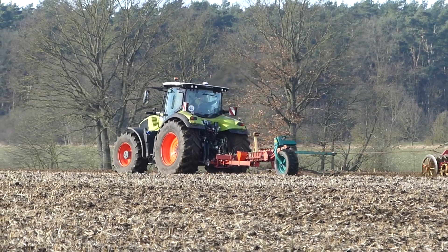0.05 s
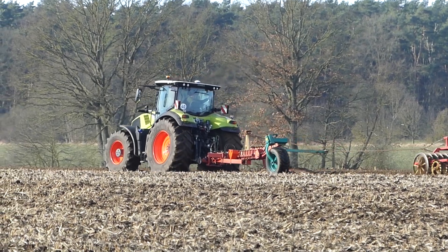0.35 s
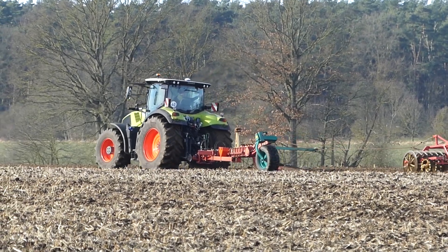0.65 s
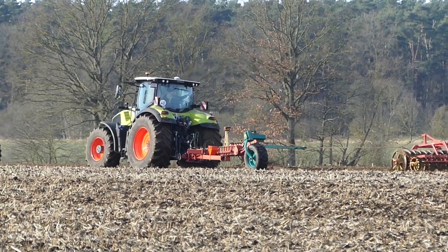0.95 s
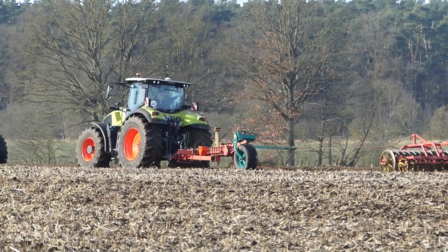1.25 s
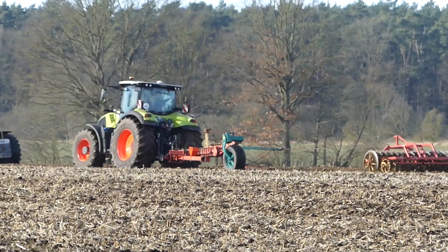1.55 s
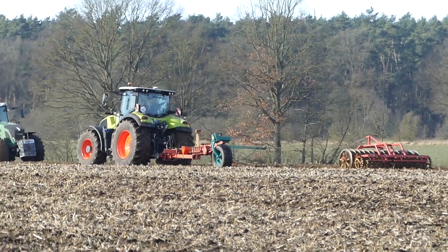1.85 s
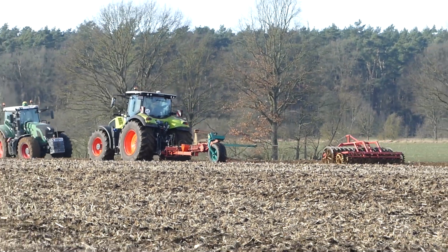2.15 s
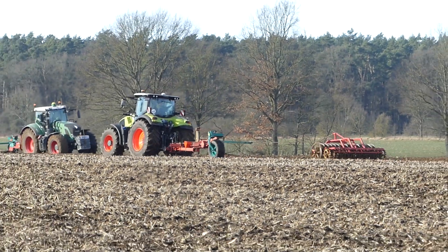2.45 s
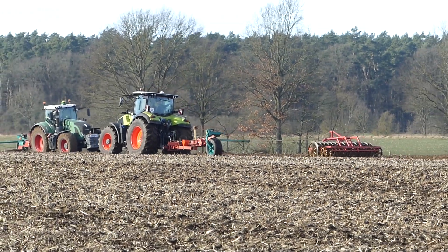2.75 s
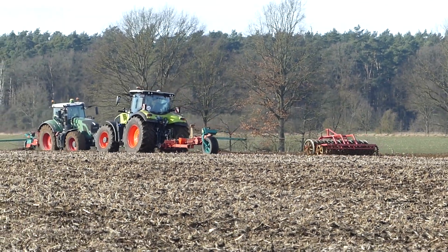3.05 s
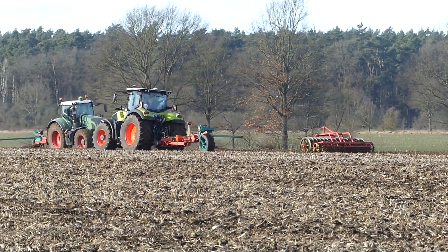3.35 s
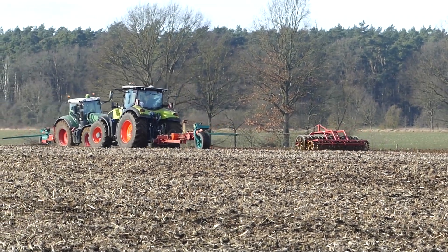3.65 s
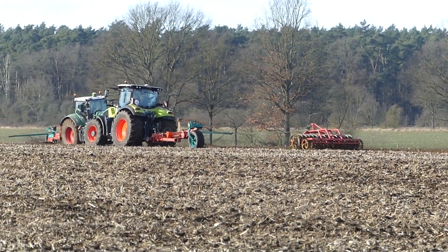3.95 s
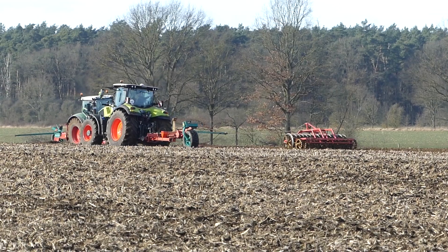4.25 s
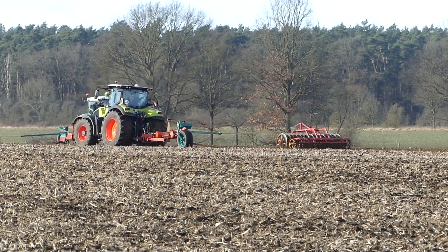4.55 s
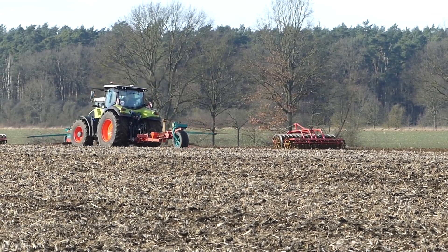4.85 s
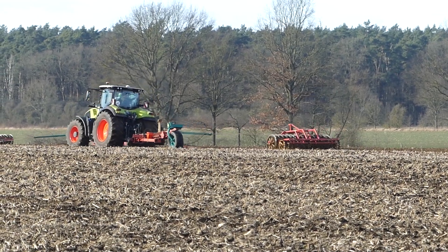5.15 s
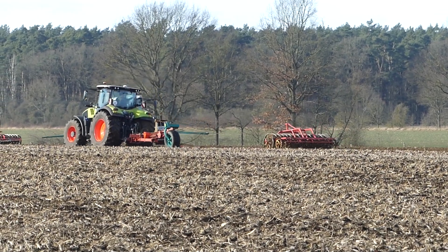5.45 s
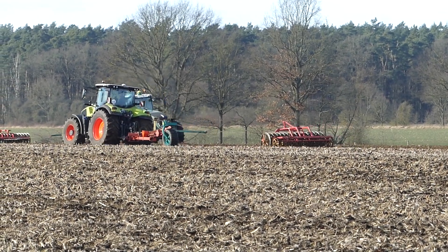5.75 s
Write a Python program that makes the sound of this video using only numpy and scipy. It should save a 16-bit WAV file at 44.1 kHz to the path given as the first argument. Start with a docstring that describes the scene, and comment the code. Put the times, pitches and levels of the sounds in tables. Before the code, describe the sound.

Far-off tractors work an open field, their low engine drones beating together over a soft wash of machinery. Gusts buffet the microphone close up, making it crackle, and a plastic lever ticks once. A faint gliding bird whistle comes about halfway through, then a run of dull, distant metal clunks. The wind eases briefly as the tractors grow louder, then returns with a second, wavering bird call.

```python
"""Dry stubble field. Far-off diesel tractors work it: beating exhaust drones, a wash of machinery,
an implement's steel frame clunking. Wind buffets the camcorder's microphone, which crackles now and then;
the zoom lever ticks and its motor whirs for a second. A bird of prey mews twice overhead,
a gliding whistle shaped by its throat. Faint hiss underneath."""
import sys
import numpy as np
from scipy import signal
from scipy.fft import rfft, irfft, next_fast_len
from scipy.io import wavfile
from scipy.ndimage import uniform_filter1d

SR = 44100
rng = np.random.default_rng(int(sys.argv[2]) if len(sys.argv) > 2 else 0)


def dump_mix(stems):
    """Bounce the given channels to the path in sys.argv[1] as a 16-bit WAV at rate SR."""
    frames = np.atleast_2d(stems).T  # one column per channel
    limited = np.clip(frames, -1, 1)  # hard clip at full scale
    pcm = np.round(limited * 32767).astype(np.int16)
    wavfile.write(sys.argv[1], SR, pcm)


N = 260190
TIME = np.arange(N) / SR

# gears, fans and tines in the soil: t/s, level/dB
MACHINERY_LEVEL = [(0.0, -71), (0.25, -75.5), (0.71, -76), (0.85, -74), (1.35, -74.5), (1.64, -71.5),
                   (2.02, -75), (2.46, -72), (3.86, -71), (4.67, -68.5), (5.01, -67.5), (5.36, -63.5),
                   (5.65, -69), (5.9, -71)]
# breeze at the microphone, two lulls: t/s, level/dB
BREEZE_LEVEL = [(0, -32.5), (1.1, -36.5), (3.8, -36), (3.97, -45.5), (4.45, -41), (4.95, -47),
                (5.35, -32.5), (5.9, -33)]


def undb(db):
    """Decibels to gain."""
    return 10 ** (np.asarray(db) / 20)


def unit(x):
    """Scale to rms 1."""
    return x / np.sqrt(np.mean(x ** 2))


def curve(rows):
    """Straight lines through (t/s, value) rows."""
    return np.interp(TIME, *np.transpose(rows))


def walk(rate_hz):
    """Smooth random wander, spread near 1."""
    hold = max(int(SR / rate_hz), 2)
    steps = np.repeat(rng.standard_normal(N // hold + 2), hold)
    return 1.287 * uniform_filter1d(uniform_filter1d(steps, hold), hold)[:N]


def resonance(hz, centre_hz, width_hz):
    """Complex gain of a resonance, 1 at its centre."""
    return 1j * hz * width_hz / (centre_hz ** 2 - hz ** 2 + 1j * hz * width_hz)


def colour(spectrum):
    """Gain over frequency through (f/Hz, level/dB) rows."""
    knots_hz, db = np.transpose(spectrum)
    return lambda hz: undb(np.interp(np.log(hz), np.log(knots_hz), db))


def noise(gain_at, band_hz=(0, SR)):
    """Noise shaped by gain_at(hz), rms 1 within the band."""
    size = next_fast_len(N)
    hz = np.arange(size // 2 + 1) * SR / size
    gain = gain_at(hz + 1e-6)
    in_band = (hz >= band_hz[0]) & (hz <= band_hz[1])
    power = np.sum(np.abs(gain[in_band]) ** 2) / len(hz)
    return irfft(rfft(rng.standard_normal(size)) * gain, size)[:N] / np.sqrt(power)


def even_noise(spectrum, window_s):
    """Coloured noise with its envelope evened out, rms 1."""
    raw = noise(colour(spectrum))
    envelope = np.abs(signal.hilbert(raw, next_fast_len(N))[:N])
    power = uniform_filter1d(envelope ** 2, int(window_s * SR))
    return unit(raw / np.sqrt(power + .1))


def hiss(treble_db=-82, follow_db_per_db=0.46):
    """Smooth treble hiss that swells a little with the machinery."""
    # hiss spectrum: f/Hz, level/dB
    spectrum = [(500, -1.5), (3000, 2.8), (6000, 1.2), (10000, 2.4), (15000, 2.5)]
    bed = noise(colour(spectrum), band_hz=(7000, 15000))
    work_db = curve(MACHINERY_LEVEL)
    return bed * undb(treble_db + follow_db_per_db * (work_db - work_db.mean()))


def gusts(lead_s=0):
    """Gust pressure envelope: bell-shaped surges that add in power."""
    # gusts at the microphone: t/s, level/dB, half width/s
    surges = [(0.068, -20, .045), (.28, -26, .04), (.385, -22, .045), (.455, -20.5, .04), (.53, -27, .04),
              (0.701, -28, .035), (0.918, -23.5, .045), (1.142, -30, .04), (1.656, -22, .065),
              (1.791, -20, .045), (2.021, -27.5, .035), (2.227, -29.5, .04), (2.494, -21.5, .05),
              (2.699, -29.5, .04), (2.917, -28, .04), (3.1, -28.5, .06), (3.264, -28, .04),
              (3.613, -26, .055), (3.761, -27.5, .07), (4.187, -26.5, .05), (4.461, -31, .045),
              (4.655, -28.5, .05), (5.47, -25, .09)]
    bells = [undb(db) * np.exp(-((TIME + lead_s - s) / width_s) ** 2) for s, db, width_s in surges]
    return np.sqrt(sum(bell ** 2 for bell in bells))


def wind(unrest_db=3, strong_gust_db=-22, thump_db=-32, thump_db_per_db=2.07, eddy_share_db=-21):
    """Slow pressure swings on the microphone; quicker eddies thump just ahead of strong gusts."""
    # slow swings: f/Hz, level/dB
    buffet_spectrum = [(1, -52), (5, -10), (11, 5.5), (21, 4), (32, -9.5), (55, -36), (90, -35), (160, -48),
                       (400, -68.5), (2000, -130)]
    # small eddies: f/Hz, level/dB
    eddy_spectrum = [(15, -8.5), (35, 10.5), (58, 2.5), (100, -14), (160, -25.5), (300, -32.5),
                     (700, -46.5), (2000, -78), (6000, -130)]
    breeze = undb(curve(BREEZE_LEVEL) + unrest_db * walk(14))
    thumps = undb(thump_db) * (gusts(lead_s=0.017) / undb(strong_gust_db)) ** thump_db_per_db
    buffet = even_noise(buffet_spectrum, window_s=0.05) * np.hypot(breeze, gusts())
    eddies = even_noise(eddy_spectrum, window_s=0.066) * (thumps + undb(eddy_share_db) * breeze)
    return buffet + eddies


def crackle(corner_hz=45, first_share=0.51, small_per_s=8, small_db=-51.5, small_spread_db=5,
            fizz_db=-41, fizz_s=0.024):
    """Microphone crackles: sharp two-stage clicks; small ones crowd in strong wind."""
    # sharp crackles: t/s, jump height/dB, second-stage lag/ms
    sharp = [(.0641, -29, .07), (.0659, -29, .12), (.084, -29, 0.11), (.122, -44.5, .05),
             (.1795, -41.5, 0.018), (.387, -35, .02), (.426, -40, 0.012), (.454, -46, .05),
             (.503, -42.5, 0.12), (.612, -40.5, 0.0041), (.677, -46.5, .3), (.754, -43.5, 0),
             (.913, -29.5, 0), (.946, -31, 0.076), (1.027, -36, .3), (1.159, -34, 0.087),
             (1.8, -35.5, 0.094), (1.835, -35.5, 0.17), (1.913, -42, 0.022), (2.051, -36, 0.31),
             (2.168, -45, 0.0051), (2.5465, -32, 0.033), (2.684, -45.5, .18), (2.745, -41, 0.0089),
             (2.9245, -36, .12), (3.036, -44, 0.021), (3.913, -41.5, 0.069), (4.096, -44.5, .07),
             (5.436, -32.5, .24), (5.489, -36, 0.22), (5.516, -38, 0.0098), (5.631, -42.5, 0.0093),
             (5.775, -39.5, 0), (5.844, -40, .03)]
    when, size, lag = rng.random((int(small_per_s * N / SR), 3)).T
    exposure = np.cumsum(undb(curve(BREEZE_LEVEL)) + gusts())
    times_s = np.minimum(np.interp(when, exposure / exposure[-1], TIME), TIME[-1] - .01)
    small = zip(times_s, small_db + small_spread_db * (2 * size - 1), .2 * lag)
    jumps = np.zeros(N)
    for s, db, lag_ms in [*sharp, *small]:
        height, start = undb(db), int(s * SR)
        jumps[start] += first_share * height
        jumps[start + int(round(lag_ms * SR / 1000))] += (1 - first_share) * height
    clicks = signal.lfilter([1], [1, -np.exp(-2 * np.pi * corner_hz / SR)], jumps + 1e-18)
    # a brief, faint treble fizz is added after each click
    tails = signal.lfilter([1], [1, -np.exp(-1 / (fizz_s * SR))], np.abs(jumps) + 1e-18)
    fizz = noise(lambda hz: resonance(hz, centre_hz=4300, width_hz=5100))
    return clicks + undb(fizz_db) * tails * fizz


def zoom():
    """The plastic lever ticks and the lens motor whirs."""
    # motor whir: t/s, level/dB
    motor_level = [(1.35, -110), (1.5, -89), (1.9, -89), (2.45, -83.5), (2.62, -110)]
    # lever ticks: t/s, level/dB
    ticks = [(1.4398, -61), (1.444, -61), (1.4514, -54.5), (1.455, -53)]
    # lever modes: f/Hz, level/dB, t60/s
    modes = [(1370, 0, 0.0046), (2780, 2, 0.0021), (3640, 0, 0.0052), (6430, -10, 0.0073)]
    whir = noise(lambda hz: resonance(hz, centre_hz=4100, width_hz=2200) ** 2)
    sound = undb(curve(motor_level)) * whir
    t = TIME[:SR // 20]
    ring = sum(undb(db - 60 * t / t60_s) * np.sin(2 * np.pi * hz * t) for hz, db, t60_s in modes)
    for s, db in ticks:
        sound[int(s * SR):][:len(t)] += undb(db) * ring
    return sound


def mew(glide, opening_db, tail_db, release_s, third_db,
        attack_s=0.046, hold_s=0.045, sink_s=0.015, catch_s=0.0083, jitter=0.0059, flutter_db=2.4):
    """Gliding whistle, loud then softer; harmonics 2 and 3 take turns in the throat's resonance."""
    # throat response: f/Hz, level/dB
    throat = [(700, -35), (1300, -30), (1520, -4), (1800, 1), (2100, 0), (2400, 3), (2650, -1), (3050, -3),
              (3700, -19), (5000, -45)]
    # voice catches at pitch drops: t/s
    catches = [5.297, 5.548]
    age_s, left_s = TIME - glide[0][0], glide[-1][0] - TIME
    gate = np.clip(age_s / attack_s, 0, 1) * np.sqrt(np.clip(left_s / release_s, 0, 1))
    gate *= np.prod([1 - np.exp(-((TIME - s) / catch_s) ** 2) for s in catches], axis=0)
    effort = np.exp(-np.maximum(age_s - attack_s - hold_s, 0) / sink_s)
    pitch_hz = curve(glide) * (1 + jitter * walk(250))
    phase = 2 * np.pi * np.cumsum(pitch_hz) / SR
    orders = np.arange(1, 4)[:, None]
    weights = colour(throat)(orders * pitch_hz) / orders ** 2 * undb((orders == 3) * third_db)
    weights *= np.sqrt(2 / np.sum(weights ** 2, axis=0))
    flutter = undb(flutter_db * np.array([walk(50) for _ in orders]))
    voice = np.sum(flutter * weights * np.sin(orders * phase), axis=0)
    return voice * gate * (effort * undb(opening_db) + (1 - effort) * undb(tail_db))


def bird(echo_db=-17, echo_t60_s=0.17, echo_delay_s=0.03):
    """Two mews and their faint scatter from the edge of the wood."""
    # pitch per mew, a long fall, then a wavering one: t/s, f/Hz
    glides = [
        [(2.865, 920), (2.897, 1245), (2.922, 1285), (2.931, 1425), (2.939, 1275), (2.98, 1165), (3.15, 895),
         (3.29, 795), (3.41, 730), (3.47, 650)],
        [(5.175, 985), (5.2, 1180), (5.235, 1240), (5.288, 1155), (5.3, 950), (5.33, 890), (5.425, 1035),
         (5.465, 865), (5.52, 885), (5.56, 700), (5.61, 855), (5.66, 880), (5.73, 710)],
    ]
    # shape per mew: opening/dB, tail/dB, release/s, third-harmonic trim/dB
    shapes = [(-61, -76, 0.058, -0.5), (-64.5, -68, 0.2, -3)]
    calls = sum(mew(glide, *shape) for glide, shape in zip(glides, shapes))
    t = TIME[:SR]
    trees = rng.standard_normal(SR) * undb(-60 * t / echo_t60_s) * (t > echo_delay_s)
    return calls + undb(echo_db) * signal.fftconvolve(calls, trees / np.linalg.norm(trees))[:N]


def implement(rattle_db=-75.5, rattle_spread_db=3, rise_s=0.0042):
    """Loose steel rattles and clunks through the frame's resonance, blurred by distance."""
    # hollow frame clunks: t/s, level/dB, decay/s
    clunks = [(0.322, -64.5, 0.03), (1.51, -63, 0.011), (3.236, -53.5, 0.0084), (3.299, -61.5, .035),
              (3.614, -57, 0.037), (3.7, -61, 0.026), (3.74, -51.5, 0.011), (3.815, -62.5, .03),
              (3.929, -62, 0.038), (4.021, -57, 0.019), (4.195, -60.5, 0.023), (4.57, -61, 0.026),
              (4.925, -64, 0.12)]
    shake = undb(rattle_db + rattle_spread_db * walk(16))
    for s, db, decay_s in clunks:
        shake += undb(db) * np.exp(-np.maximum((s - TIME) / rise_s, (TIME - s) / decay_s))
    return shake * noise(lambda hz: resonance(hz, centre_hz=606.4, width_hz=157) ** 2)


def engine(firing_hz, harmonic_db, uneven_db, wander=.002, fading_db=1.92, knee_hz=190, cylinders=6):
    """Exhaust drone of one diesel, and its firing phase."""
    rate_hz = firing_hz * (1 + wander * walk(1.98))
    phase = 2 * np.pi * (np.cumsum(rate_hz) / SR + rng.random())
    firing = sum(undb(db + fading_db * walk(5)) * np.sin(k * phase)
                 for k, db in enumerate(harmonic_db, 1))
    # unequal cylinders repeat once a cycle: weak lines between the firing harmonics
    orders = np.array([k for k in range(cylinders + 1, cylinders ** 2) if k % cylinders])
    cycle = np.linspace(0, 2 * np.pi, 2048)
    weights = 1 / (1 + (orders * firing_hz / cylinders / knee_hz) ** 4)
    lumps = weights @ np.sin(np.outer(orders, cycle) + 2 * np.pi * rng.random((len(orders), 1)))
    lope = unit(np.interp(phase / cylinders % (2 * np.pi), cycle, lumps))
    return np.sqrt(2) * firing + undb(uneven_db + fading_db * walk(3.6)) * lope, phase


def tractors(knock_depth=0.24, flicker_db=1.0, wash_db=-6.5, whine_fading_db=4, whine_waver=0.0035):
    """Three drones beat together; each one's clatter pulses with its firings, flickers in moving air."""
    # diesels: firing rate/Hz, harmonics 1, 2, 3/dB, uneven-cylinder lines/dB
    engines = [(89.97, 0.5, -22, -26.5, -19), (77.24, -11, -8.5, -24.5, -12),
               (80.55, -20, -16.5, -33.5, -15)]
    # exhaust carrying across the field: t/s, level/dB
    drone_level = [(0, -53.5), (1.2, -58.5), (2.1, -57.5), (3.1, -55), (3.7, -53), (4.5, -49), (5.3, -46.5),
                   (5.6, -52), (5.9, -49)]
    # machinery wash: f/Hz, level/dB
    wash_spectrum = [(30, 0.5), (60, 2), (110, 14), (190, 16), (270, 7), (430, 4.5), (620, -4), (760, 0),
                     (1050, -0.5), (1400, -2), (2000, -9.5), (3000, -17), (4500, -28), (9000, -43.5)]
    # gear teeth, wavering with load: f/Hz, level/dB re machinery
    whines = [(1000, -12), (1339, -18), (1430, -16.5)]
    drone, machinery = 0, 0
    for firing_hz, *harmonic_db, uneven_db in engines:
        exhaust, phase = engine(firing_hz, harmonic_db, uneven_db)
        drone += exhaust
        wash = noise(colour(wash_spectrum), band_hz=(800, 2000))
        knock = 1 + knock_depth * np.cos(phase)
        machinery += wash * knock * undb(wash_db + flicker_db * walk(18))
    for hz, db in whines:
        mesh_phase = 2 * np.pi * np.cumsum(hz * (1 + whine_waver * walk(20))) / SR
        machinery += undb(db + whine_fading_db * walk(6.9)) * np.sin(mesh_phase)
    return drone * undb(curve(drone_level)) + machinery * undb(curve(MACHINERY_LEVEL))


def scene():
    """The field plus the noises at the camcorder, mono."""
    field = tractors() + implement() + bird()
    near = hiss() + wind() + crackle() + zoom()
    return (field + near)[None]


def record(dry):
    """The camcorder cuts the top treble."""
    top_hz = 15800
    return signal.sosfilt(signal.ellip(10, .2, 80, top_hz, fs=SR, output="sos"), dry)


dry = scene()
out = record(dry)
dump_mix(out)
```